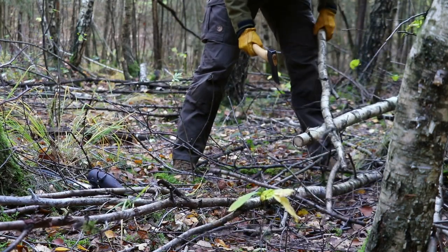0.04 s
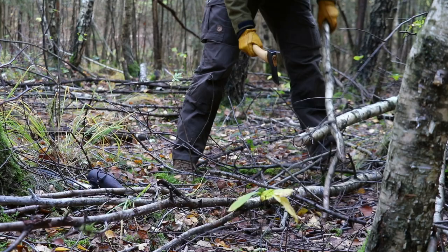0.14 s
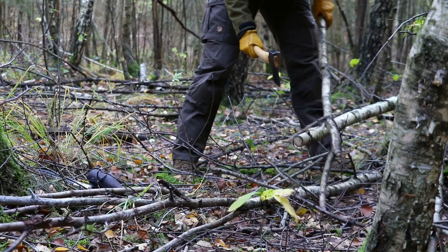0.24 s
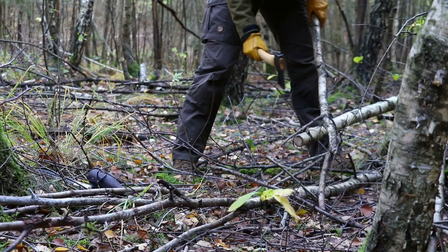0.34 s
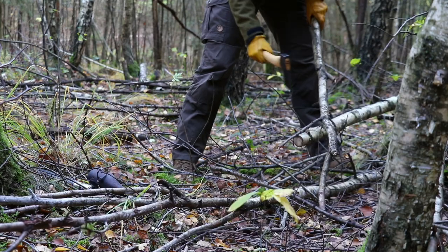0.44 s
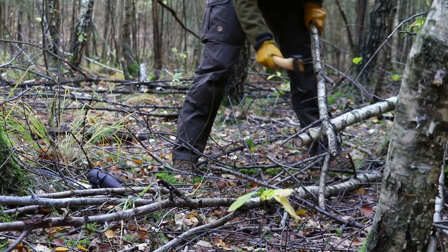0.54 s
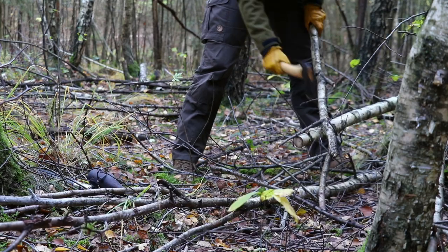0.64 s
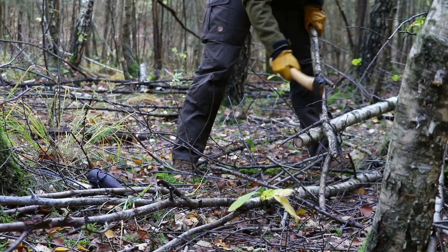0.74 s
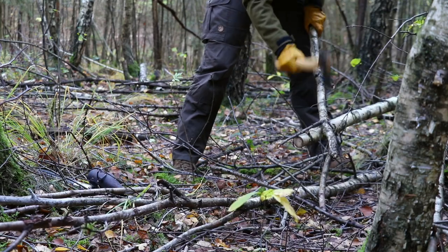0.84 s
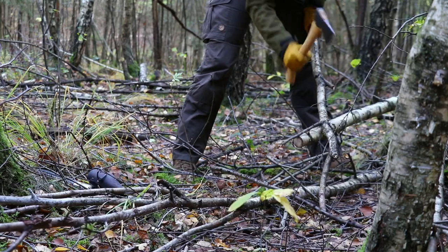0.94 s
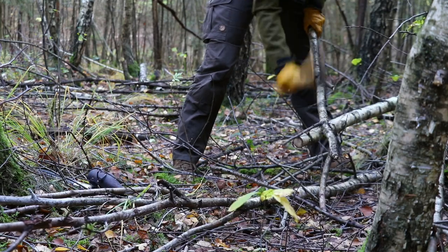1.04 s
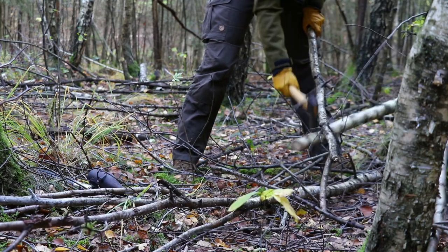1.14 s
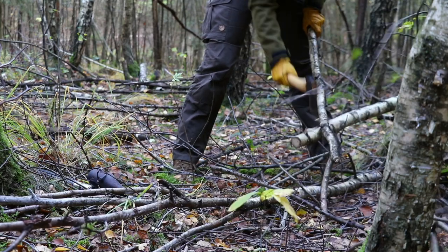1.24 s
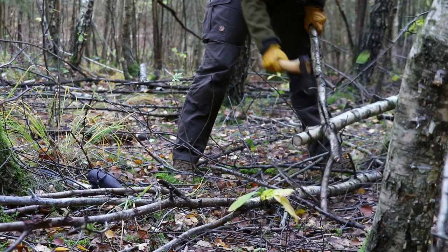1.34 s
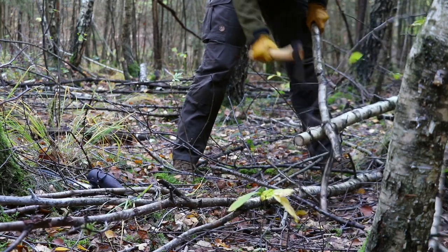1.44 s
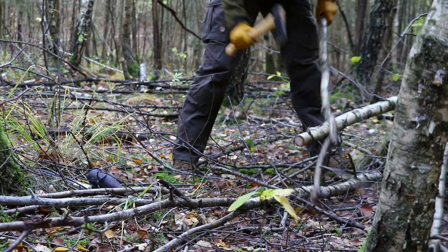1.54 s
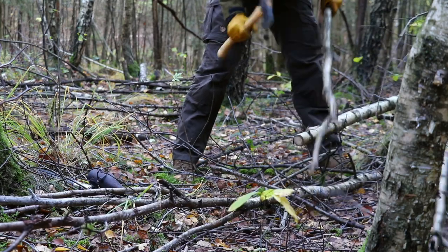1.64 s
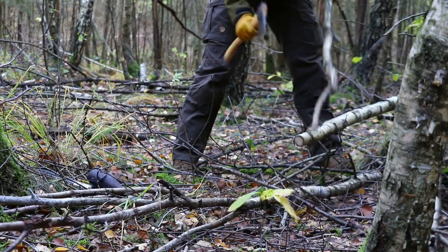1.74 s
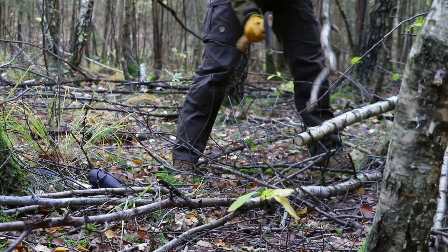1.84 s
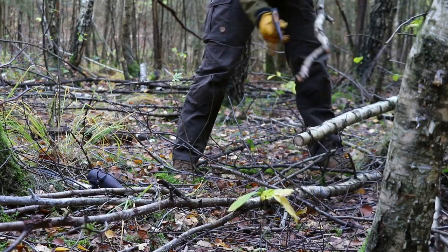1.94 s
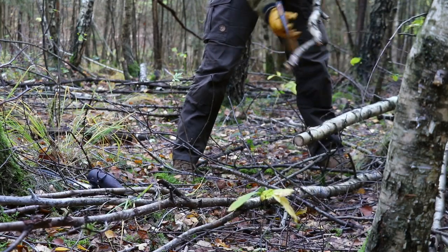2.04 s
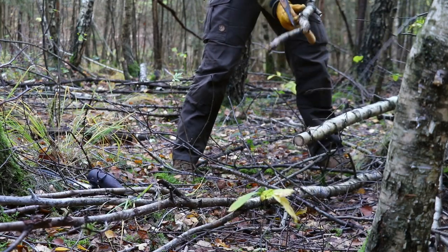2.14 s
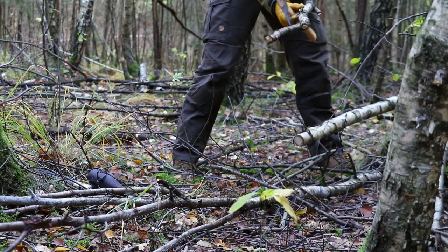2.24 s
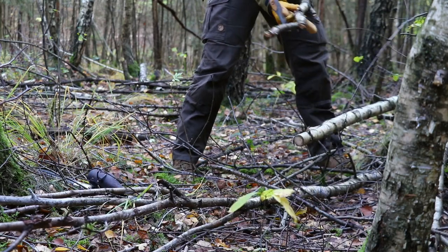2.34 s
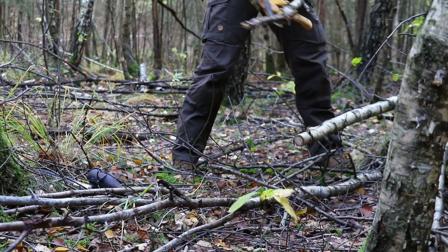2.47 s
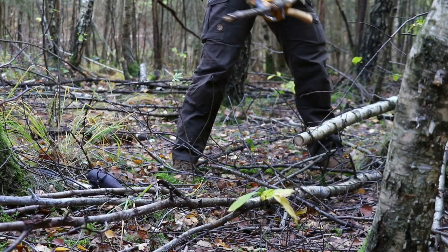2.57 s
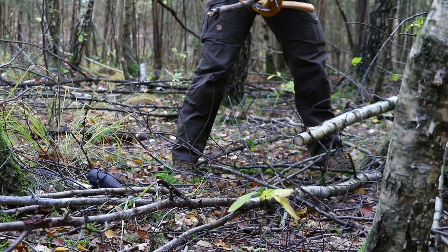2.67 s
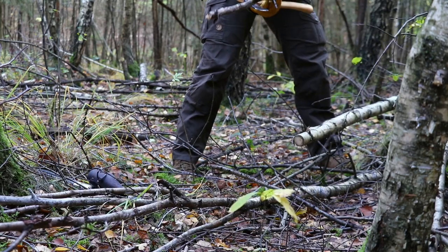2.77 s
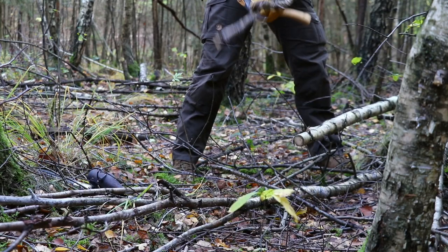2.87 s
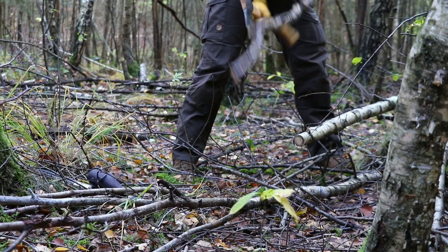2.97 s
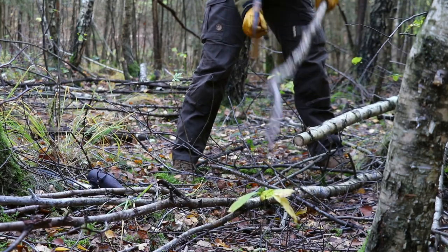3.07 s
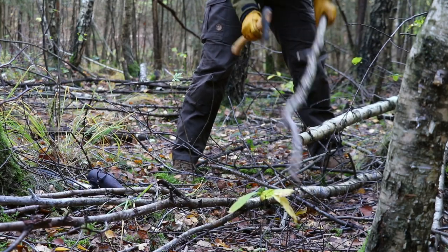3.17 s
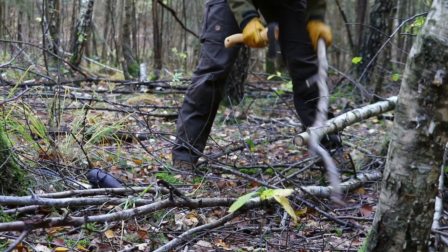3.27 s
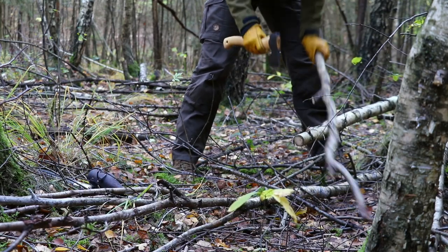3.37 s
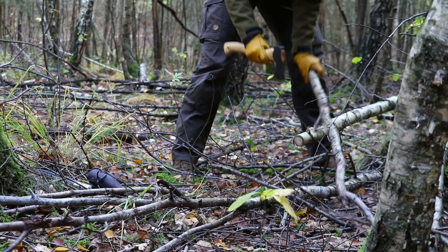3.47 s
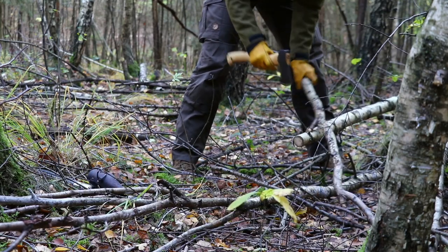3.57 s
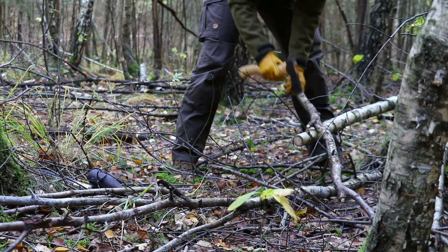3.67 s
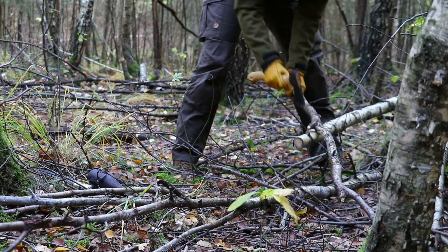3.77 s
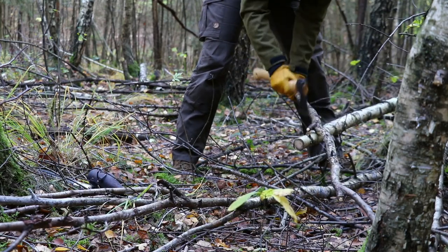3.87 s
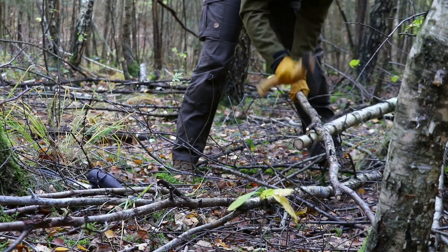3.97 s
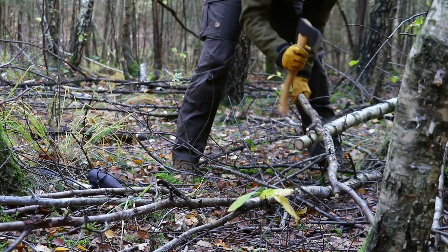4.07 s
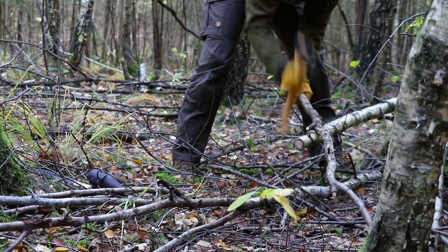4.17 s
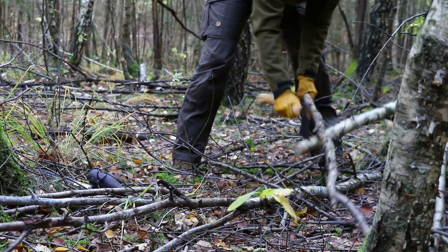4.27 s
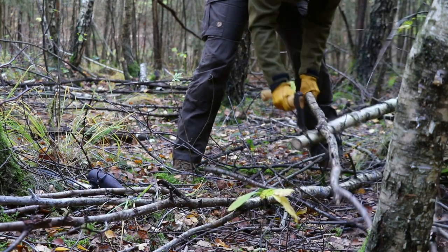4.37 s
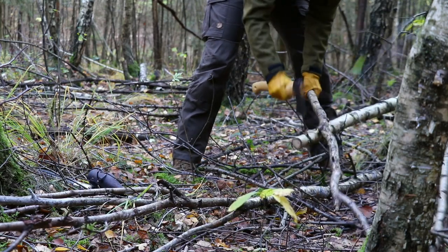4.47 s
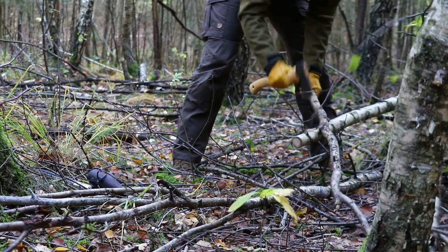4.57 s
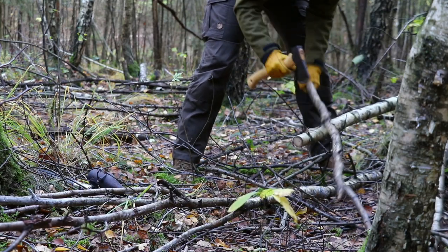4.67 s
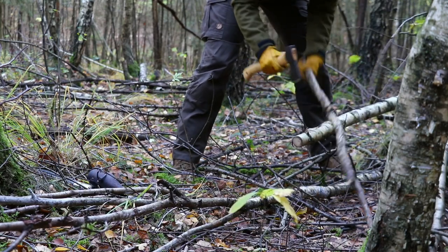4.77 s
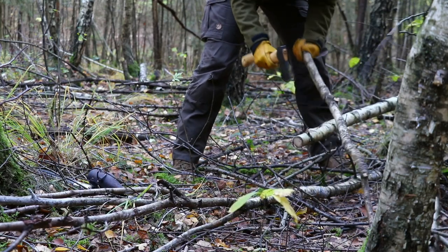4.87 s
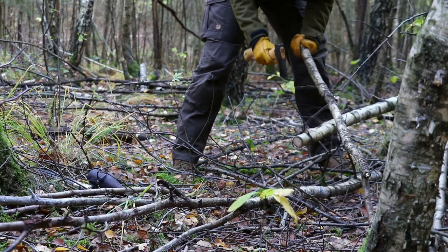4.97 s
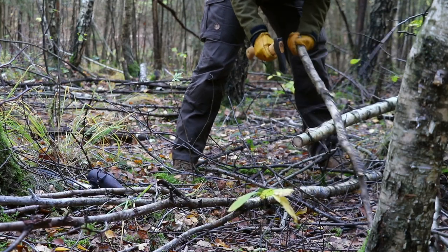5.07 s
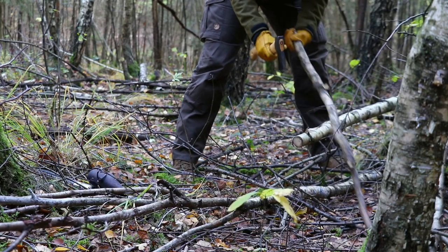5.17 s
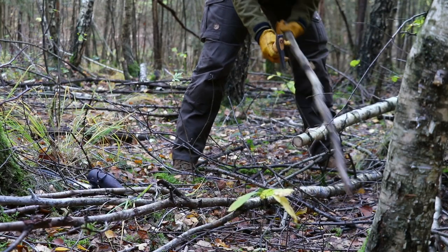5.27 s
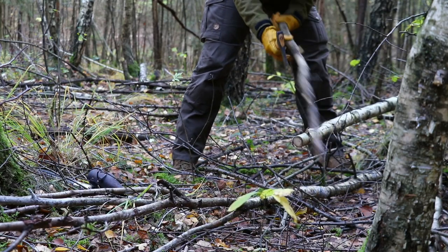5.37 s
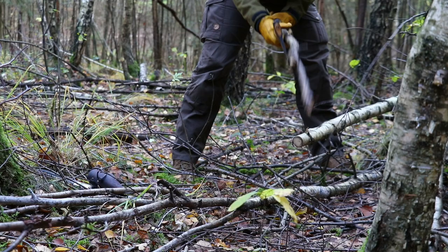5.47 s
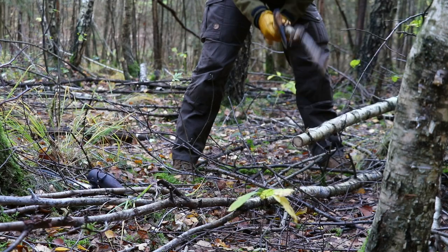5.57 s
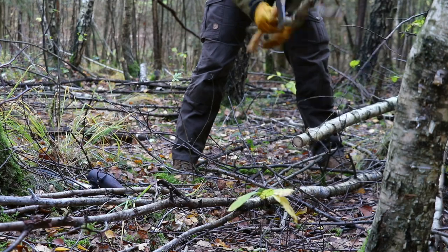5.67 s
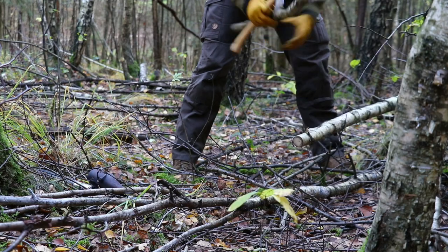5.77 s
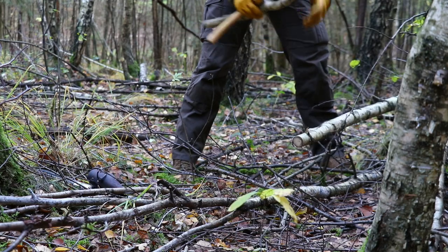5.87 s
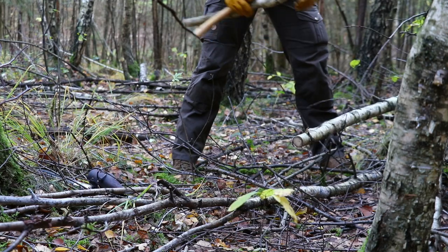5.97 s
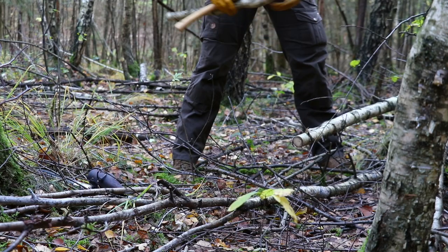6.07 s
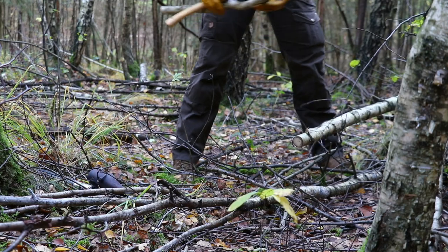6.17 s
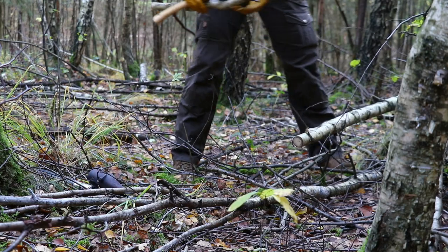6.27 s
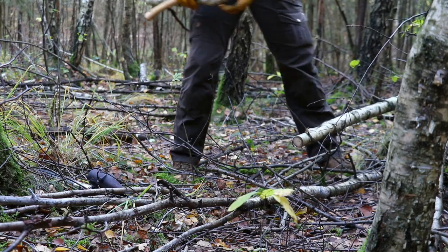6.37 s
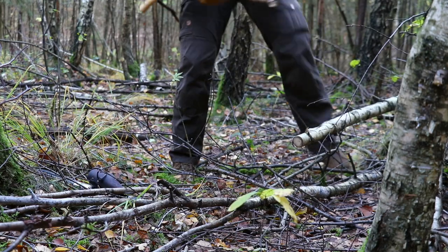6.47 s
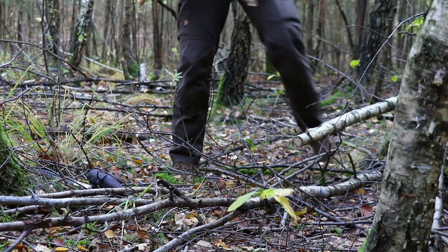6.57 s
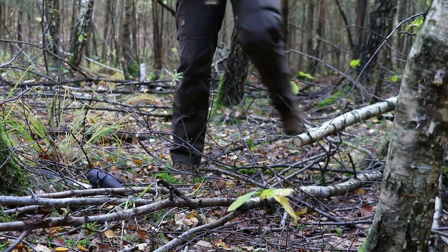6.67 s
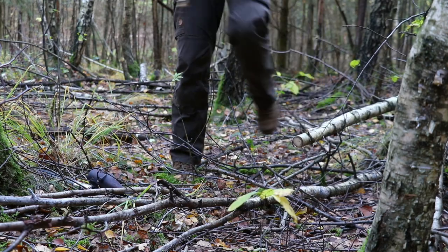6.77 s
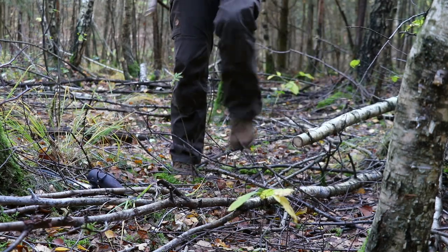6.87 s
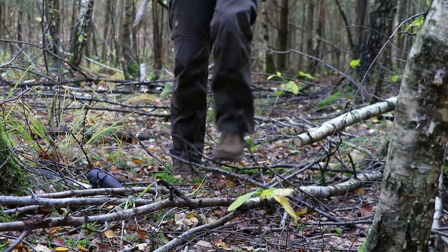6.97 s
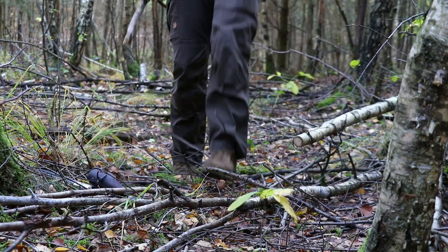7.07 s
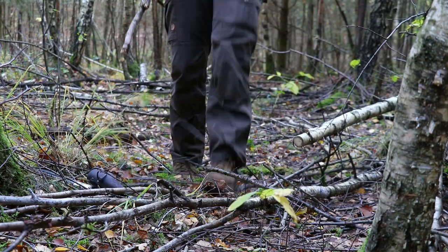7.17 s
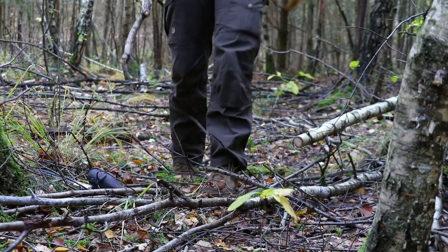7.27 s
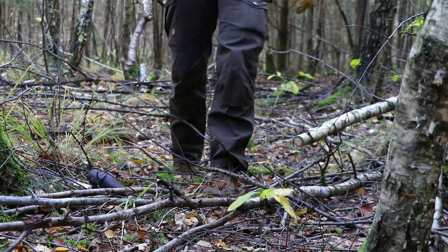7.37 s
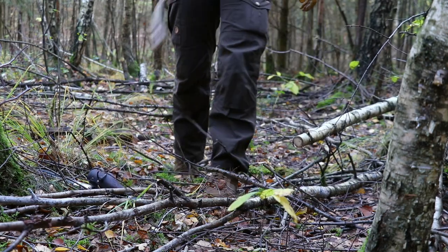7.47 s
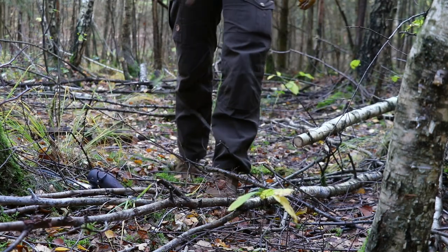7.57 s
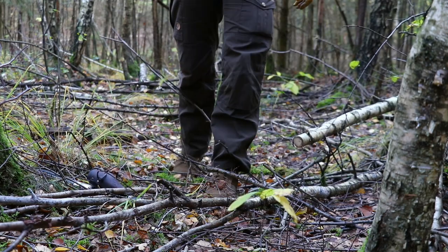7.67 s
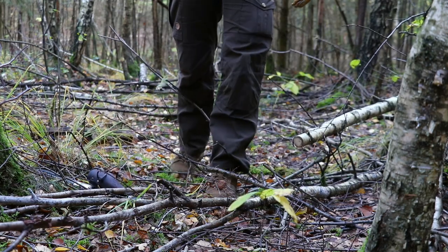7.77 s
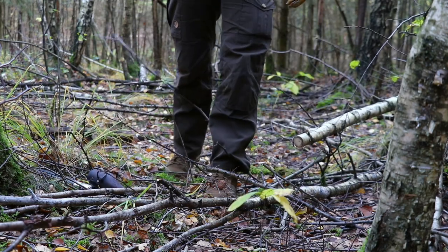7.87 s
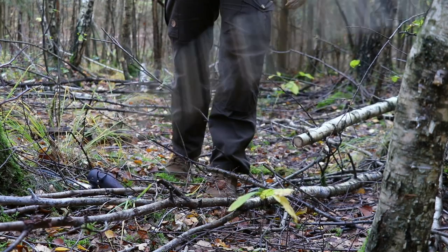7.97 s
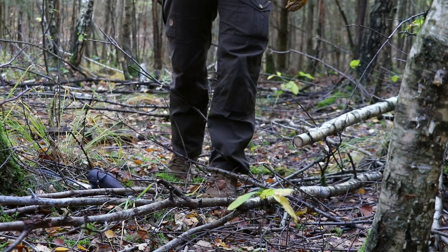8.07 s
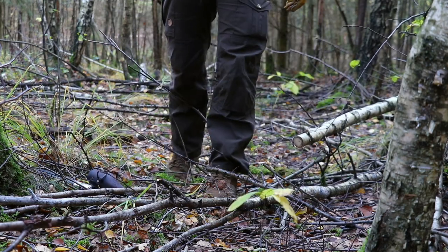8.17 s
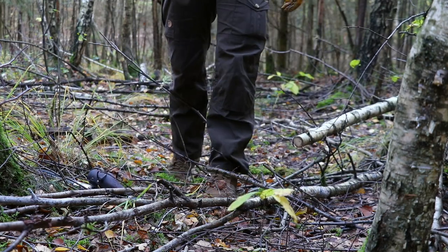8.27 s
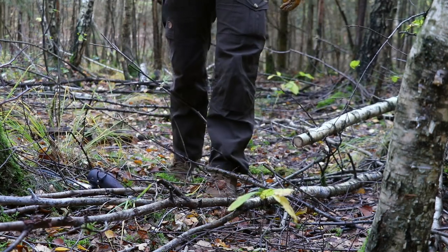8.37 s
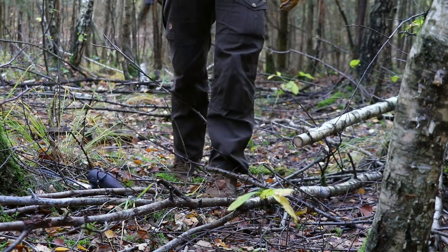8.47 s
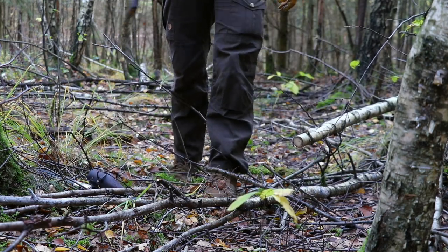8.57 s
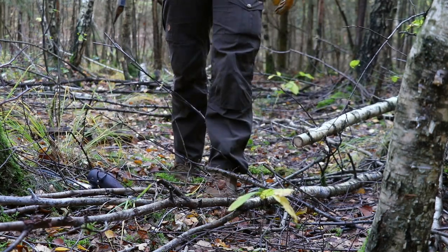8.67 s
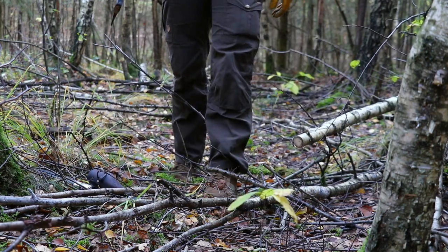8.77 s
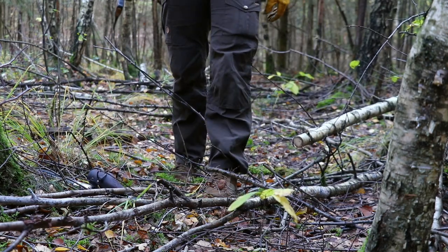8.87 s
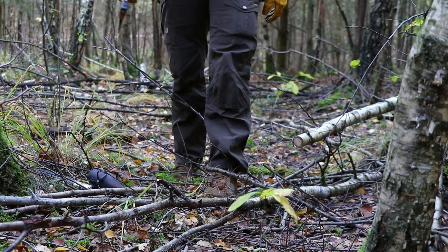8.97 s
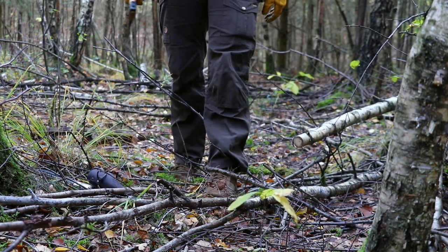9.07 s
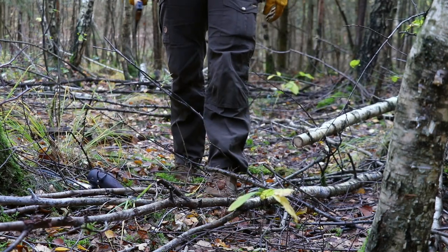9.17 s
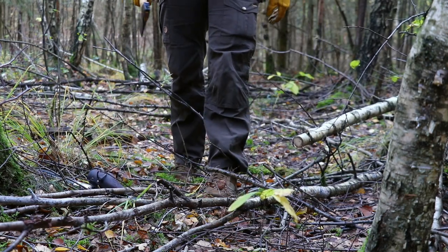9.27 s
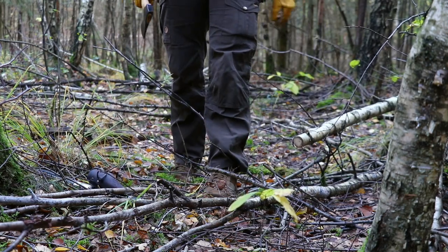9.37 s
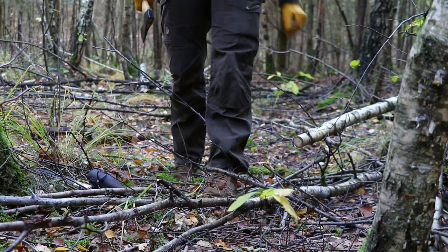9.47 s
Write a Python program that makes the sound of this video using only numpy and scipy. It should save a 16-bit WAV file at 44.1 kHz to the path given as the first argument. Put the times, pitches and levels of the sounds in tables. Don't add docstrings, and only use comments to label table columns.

```python
import sys
import numpy as np
from scipy import signal
from scipy.fft import rfft, irfft
from scipy.io import wavfile
from scipy.ndimage import uniform_filter1d

SR = 44100
rng = np.random.default_rng(int(sys.argv[2]) if len(sys.argv) > 2 else 0)


def transcribe(signal):
    frames = np.atleast_2d(signal).T
    limited = np.clip(frames, -1, 1)
    pcm = np.round(limited * 32767).astype(np.int16)
    wavfile.write(sys.argv[1], SR, pcm)


def to_linear_factor(level_db):
    exponent = np.asarray(level_db, float) / 20
    return 10 ** exponent


N = 420273
TIME = np.arange(N) / SR

# frequency in Hz, density in dB per Hz.
TRAFFIC_SPECTRUM = [(15, -45), (25, -0.5), (74, 3.5), (103, -1), (139, -3), (167, -3), (196, -7), (280, -5),
                    (430, -4.5), (1210, -7), (1800, -13), (2340, -47), (3960, -120)]
# frequency in Hz, density in dB per Hz.
HISS_SPECTRUM = [(1060, -30), (1800, 1.5), (2450, -2.5), (3040, -3.5), (3490, -5.5), (3960, -7.5),
                 (5200, -12), (6010, -8.5), (7740, -8), (9200, -10), (15700, -19.5)]
# frequency in Hz, likeness from 0 to 1.
PORT_LIKENESS = [(60, 0.97), (130, 0.85), (290, 0.83), (640, 0.5), (1410, 0), (3100, 0), (6820, 0.01),
                 (15000, 0.06)]
# time in seconds, level in dB.
TRAFFIC_LEVEL = [(0, -50), (1.5, -49.5), (2.5, -50.5), (4.5, -51), (6.2, -51.5), (7.1, -50), (8.0, -51.5),
                 (9.53, -51.5)]
# time in seconds, second order in Hz, its level in dB.
ENGINE = [(0, 168, -60.5), (1.5, 168, -74), (2.6, 167, -63), (4.5, 168, -60.5), (5.9, 170.5, -56),
          (7, 169, -56.5), (7.9, 167, -61.5), (8.4, 150, -62.5), (9.53, 149, -67)]
# peak in seconds, treble in dB, rise in ms, fall in ms, middle re treble in dB.
BRUSHES = [(0.002, -53, 9.7, 77, 6), (0.256, -60, 370, 86, 3), (1.11, -47.5, 9.4, 220, -1),
           (1.36, -50, 79, 97, 0.5), (1.469, -47, 22, 34, -0.5), (1.63, -48.5, 240, 98, 1),
           (2.05, -71, 240, 107, -4), (2.36, -62.5, 53, 265, -2.5), (2.87, -54, 82, 30, -1.5),
           (3.49, -54, 31, 42, 5), (3.66, -63.5, 74, 150, 7.5), (4.24, -42.5, 10.6, 69, 2.5),
           (4.488, -46.5, 15, 11, -3), (4.6, -55, 356, 192, 0.5), (4.83, -42, 2, 7.9, -5),
           (5.65, -59.5, 500, 99, 0.5), (6.0, -59.5, 77, 73, 8), (6.21, -61, 150, 240, -14)]
LEAVES = [(6.48, -59, 68, 220, 2.5), (6.98, -53.5, 140, 460, 4.5), (7.163, -49, 167, 120, 2.5),
          (7.35, -49.5, 34, 68, -0.5), (7.61, -54, 45, 63, 4.5), (7.9, -58, 110, 15, 3),
          (8.04, -49, 14, 5.2, -12.5), (8.075, -47.5, 5.2, 101, 1.5), (8.143, -30, 9.5, 82, -4.5),
          (8.196, -35.5, 19, 41, -17.5), (8.29, -37.5, 43, 45, -0.5), (8.343, -33, 17, 42, -3.5),
          (8.42, -47.5, 19, 270, -1), (8.85, -85, 97, 300, -10), (9.32, -69, 56, 200, -13)]
# start in seconds, length in seconds, first Hz, last Hz, level in dB.
BIRD_CALLS = [(0.155, 0.128, 7200, 7770, -62), (0.734, 0.18, 7350, 7900, -59),
              (1.957, 0.099, 7600, 7930, -63), (2.298, 0.13, 7270, 7800, -60.5),
              (2.695, 0.14, 7400, 7850, -59), (5.01, 0.085, 7450, 7860, -58),
              (5.128, 0.27, 7850, 7900, -69.5), (5.815, 0.15, 7120, 7850, -62),
              (6.15, 0.18, 7200, 8000, -61), (8.68, 0.136, 7340, 7880, -60),
              (9.255, 0.15, 7200, 7740, -65.5)]
# start in seconds, treble peak in dB, middle in dB, wood in dB, burst in ms.
CHOP_1_CRACKS = [(1.0752, -3, -11, -22, .35), (1.0764, -8, -7, -16, .9), (1.0774, -2, -11, -22, .4),
                 (1.078, 0, -12, -26, .5), (1.0835, -26, -4, 10, 1.0), (1.0895, -36, -4, 17, 1.0)]
CHOP_2_CRACKS = [(4.2131, -17, 4.5, 1, 0.78), (4.2147, -6, -1, -12, 0.82), (4.217, -10.5, -3.5, 0.5, 1.5),
                 (4.223, -15.5, 1.5, -1, 1.56), (4.2848, -28.5, -1, -19.5, 2)]
THROW_1_CRACKS = [(8.0646, -36, 16.5, 16.5, 0.89), (8.0648, -16.5, 1, 13, 0.43),
                  (8.0699, -35, 9, 22, 0.614), (8.077, -25.5, -9, 10.5, 0.58), (8.096, -25, 0, -19, 1.3),
                  (8.113, -29, -9.5, -15, 0.9), (8.121, -31, 2.5, -17, 0.94)]
THROW_2_CRACKS = [(8.1475, -17, -11, 12.5, 3.1), (8.1477, -16, 7.5, 15, 0.643), (8.150, -26, 6, 17, 0.86),
                  (8.1535, -23, -20, 2, 1.28), (8.188, -23, -16, -3, 2.3), (8.199, -28, -9.5, 3.5, 3.7),
                  (8.34, -19, -32, -17, 2.9), (8.364, -29, -6, -3, 7.5)]
# frequency in Hz, level in dB, t60 in seconds.
CHOP_1_MODES = [(459, 1, 0.032), (810, 1, 0.019), (1159, 6, 0.018), (1490, 1.5, 0.022)]
CHOP_2_MODES = [(395, -12, 0.035), (583, -9.5, 0.035), (994, -9, 0.0216), (1250, -14, 0.057),
                (1511, 5, 0.025)]
THROW_1_MODES = [(302, -5, 0.027), (700, 8, 0.0099), (1030, -8, 0.037), (1310, -8.5, 0.0243),
                 (1850, -5.5, 0.0078), (2780, -14, 0.0093)]
THROW_2_MODES = [(460, 1.5, 0.026), (786, 0, 0.018), (1250, 8, 0.011), (2000, 4, 0.012)]
# echo in dB, its tilt in dB per octave, left lag in samples, left minus right in dB.
BLOW_ECHO = [
    (-32, 1.9, 4, -7),
    (-35, 3.5, 3.6, -7.5),
    (-41, 2, 4.6, -17.5),
    (-39, 0, 5.3, -18),
]
# centre in Hz, width in Hz, share of slow tearing from 0 to 1.
BLOW_TREBLE = [
    (7150, 3000, .04),
    (7500, 5630, 0.11),
    (7540, 9800, 0.099),
    (7500, 7700, 0.063),
]
# centre in Hz, level in dB, rise in ms, t60 in seconds.
TRUNK_BANDS = [(253, -11.5, 10, 0.3), (426, -4, 26, 0.26), (764, -6.5, 9.9, 0.16), (1250, -21.5, 8.7, 0.58),
               (3150, -21.5, 4.7, 0.077), (8000, -28.5, 4.9, 0.32)]
# start in seconds, frequency in Hz, peak in dB, decay in ms.
THUDS = [(1.098, 530, -32, 4.9), (1.109, 406, -28, 2.9), (1.131, 395, -30, 4), (1.201, 84.5, -50.5, 36),
         (3.479, 88, -46.5, 17.7), (4.24, 70.8, -42, 29.5), (4.2515, 358, -25, 4.5), (4.273, 337, -31, 5.9),
         (5.936, 172, -41, 11.1), (6.859, 217, -40, 5.5), (6.952, 129, -41, 4.6),
         (7.331, 544.4, -28.5, 1.5), (1.076, 280, -33, 4), (1.084, 490, -35, 3), (1.089, 765, -39, 3),
         (4.2125, 477, -26, 0.96), (4.2135, 950, -24, 1.2), (4.214, 1455, -17, 2.4),
         (4.229, 1280, -27, 2.7), (6.8605, 1330, -36, 1.8), (6.8605, 2350, -41, 1.2),
         (8.0632, 690, -10.5, 1.6), (8.0642, 2790, -24, 1.3), (8.067, 1060, -18, 2.8),
         (8.0714, 260, -17, 1.5), (8.0965, 2800, -34, 1.5), (8.1475, 2000, -11, 2), (8.185, 1250, -28, 3),
         (8.146, 444, -15, 1.6), (8.0696, 105, -17.5, 3.8), (8.076, 55, -22, 7), (8.11, 69.6, -36.5, 8.8),
         (8.151, 138, -23.5, 4.1), (8.156, 59.8, -22.5, 12), (8.185, 104.6, -24.5, 7.2),
         (8.191, 459, -36.5, 15), (8.215, 55, -27, 5.4), (8.241, 55, -34, 11.8), (8.27, 70.1, -33, 13),
         (8.291, 85, -29.5, 6), (8.348, 96, -35, 7.1), (8.365, 140.5, -39, 6.4)]
# start in seconds, level in dB, frequency in Hz, fall in ms.
FLICKS = [(1.15, -42, 9500, 12), (1.2216, -43, 11100, 5), (1.3034, -45, 8500, 9), (1.34, -38, 11100, 2.5),
          (1.361, -39, 8800, 9), (1.4301, -47, 10300, 4), (1.455, -44, 13500, 3), (1.464, -36, 8450, 9.4),
          (1.478, -44.5, 7770, 7), (1.493, -46, 7400, 6.6), (1.51, -46, 10500, 6), (1.56, -49, 9500, 4),
          (1.575, -46, 11500, 2), (1.605, -47, 9000, 20), (3.44, -57, 2490, 40), (4.36, -46, 11000, 12),
          (4.42, -45, 10500, 12), (4.6, -47, 11000, 16), (4.828, -37, 11600, 4), (5.36, -54, 8600, 6),
          (6.689, -54, 2700, 9.6), (6.70, -52, 7500, 22), (6.9888, -36.5, 9500, 2.5), (7.02, -47, 2500, 5),
          (7.045, -47, 4500, 3), (7.073, -45, 3000, 8), (7.125, -46, 5000, 3), (7.195, -46, 3500, 4),
          (7.102, -42, 4000, 4), (7.11, -43, 7500, 5), (7.149, -44, 2200, 4), (7.165, -43, 9000, 12),
          (7.235, -46, 11000, 3), (7.291, -37, 8000, 2.7), (7.333, -32, 8000, 4), (7.345, -41, 2600, 3),
          (7.419, -41, 3000, 2.7), (7.432, -46, 7500, 5.5), (7.4801, -47, 2500, 2.7),
          (8.1856, -30, 8800, 12), (8.2601, -37, 6000, 10), (8.281, -35, 3200, 6.7), (8.284, -36, 8500, 10),
          (8.302, -20, 10500, 1.0), (8.3175, -28, 10200, 5), (8.345, -29, 10000, 8.7),
          (8.362, -37, 5500, 8), (8.445, -34, 10500, 2), (8.765, -39.5, 5500, 4)]
# start in seconds, treble peak in dB, middle in dB, wood in dB, wood pitch in Hz.
KNOCKS = [(1.2235, -39.5, -1, 10, 1290), (1.3405, -38.5, -15, 1, 905), (1.3578, -33, -12, -10, 423),
          (1.4591, -30, -18, -2.5, 474), (1.6945, -33.5, -13, -9, 436), (2.441, -35, -12, -10.5, 592),
          (4.6687, -48, 3, -6, 474), (4.828, -28, -14, -23, 537), (5.3977, -36, -4.5, -1.5, 565),
          (5.9345, -44.5, 8.5, 20.5, 865), (6.0338, -48, 0.5, 11.5, 1113), ]
TWIGS = [(6.6105, -33, -21, -21, 969), (6.8604, -43, -2, 11, 1366), (6.9532, -19.5, -4, 0, 1350),
         (6.9548, -18, -5, 0.5, 1370), (6.9572, -25, -4, 1.5, 1280), (7.1552, -21.5, -5, -29, 463),
         (7.1856, -27, -8, -19, 401), (7.211, -32, 2, -7, 400), (7.2584, -26, -3, -3.5, 496),
         (7.291, -12.5, -7.5, -22, 502), (7.3326, -12.5, -11, -10.5, 596), (7.3794, -39, 8, -23, 982),
         (7.4147, -30.5, 4, -5, 1740), (7.4465, -30, 0, -2.5, 1730), (7.4594, -38, 3.5, -7.5, 1250),
         (7.5023, -36, 0, -15.5, 406), (7.5829, -38, -3, 1.5, 953), (7.6024, -38, 8, -6.5, 767)]
DEBRIS = [(7.9935, -36.5, 2.5, 1, 580), (8.0336, -33, -1.5, -18, 610), (8.4404, -27, -25, -24.5, 565),
          (8.5478, -37, 1.5, -21.5, 401), (8.6063, -33, -6, -22.5, 401), (8.6674, -34, -1, -23, 412),
          (8.7654, -33.5, -3, -6, 1245)]
# start in seconds, length in seconds, frequency in Hz, level in dB.
SQUEAKS = [(5.996, 0.027, 4150, -47.5), (6.005, 0.0275, 2590, -51.5), (6.055, 0.02, 3400, -54)]
# time in seconds, whistle in Hz, level in dB.
WHIP = [(6.682, 2850, -63), (6.692, 2650, -52), (6.72, 2060, -57), (6.766, 1720, -57), (6.806, 1420, -53),
        (6.87, 1375, -55), (6.94, 1330, -57), (6.98, 1550, -57), (7.035, 1560, -55)]


def band(x, hz, width_hz):
    return signal.lfilter(*signal.iirpeak(min(hz, 0.45 * SR), hz / width_hz, SR), x)


def band_twice(x, hz, width_hz):
    return band(band(x, hz, width_hz), hz, width_hz)


def unit(x):
    return x / np.sqrt(np.mean(x ** 2))


def curve(table, quiet=None):
    s, *columns = np.transpose(table)
    return [np.interp(TIME, s, c, left=quiet, right=quiet) for c in columns]


def walk(rate_hz):
    k = int(SR / rate_hz)
    steps = np.repeat(rng.standard_normal(N // k + 1), k)
    return unit(uniform_filter1d(uniform_filter1d(steps, k), k)[:N])


def tone(hz, db, wobble):
    phase = 2 * np.pi * np.cumsum(hz * (1 + wobble)) / SR
    return np.sqrt(2) * to_linear_factor(db) * np.sin(phase)


def treble(x):
    hump = 0.97 * band(x, 6650, 2630) + 1.2 * band(x, 8706, 4300) + 0.293 * band(x, 10300, 7300)
    return band(hump, 8400, 9300)


def pair(x, pan_db, bass, lag_samples):
    left, right = (x * to_linear_factor(side * pan_db / 2) + bass * to_linear_factor(side * pan_db * 0.084) for side in (1, -1))
    return np.array([np.roll(left, int(lag_samples)), right])


def add(out, x, start_s):
    i = int(start_s * SR)
    out[:, i:i + x.shape[1]] += x[:, :out.shape[1] - i]


def air():
    log_hz = np.log(np.maximum(np.fft.rfftfreq(N, 1 / SR), 1))

    def spectrum(table):
        table_hz, values = np.transpose(table)
        return np.interp(log_hz, np.log(table_hz), values)

    like = np.clip(spectrum(PORT_LIKENESS), 0, 1)
    mid, side = rfft(rng.standard_normal((2, N))) * np.sqrt([1 + like, 1 - like])
    ports = np.array([mid + side, mid - side])
    low = to_linear_factor(spectrum(TRAFFIC_SPECTRUM[:-1]))
    high = to_linear_factor(spectrum(HISS_SPECTRUM[1:]))
    above_bass, above_middle = log_hz >= np.log(140), log_hz >= np.log(1800)
    bass = unit(irfft(ports * low * ~above_bass, N))
    middle = unit(irfft(ports * low * above_bass * ~above_middle, N))
    hiss = unit(irfft(ports * high * above_middle * (log_hz < np.log(HISS_SPECTRUM[-1][0])), N))
    mid_db, = curve(TRAFFIC_LEVEL)
    bass_db = -55.5 + 1.5 * (mid_db + 50.5)
    bass = bass * to_linear_factor(bass_db + 0.26 * walk(6.1))
    middle = middle * to_linear_factor(mid_db + 2.0 + 0.5 * walk(4.036))
    return bass + middle + hiss * to_linear_factor(-55.5)


def drone():
    hz, db = curve(ENGINE)
    low_db = -60.5 - 0.2121 * TIME ** 2
    second = tone(hz, db + 1.8 * walk(5), 0.004 * walk(4))
    first = tone(hz / 2, low_db + 1.8 * walk(6), 0.01 * walk(5))
    return second + first


def stirring():
    high, mid = np.full((2, N), to_linear_factor(2 * -68))
    for s, db, rise_ms, fall_ms, mid_db in BRUSHES + LEAVES:
        ms = (TIME - s) * 1000
        decay = np.where(ms < 0, -ms / max(rise_ms, 1), ms / max(fall_ms, 1))
        power = to_linear_factor(2 * db) * np.exp(-2 * decay)
        high = high + power
        mid = mid + power * to_linear_factor(2 * mid_db)
    return 10 * np.log10(high), 10 * np.log10(mid / high)


def rustle():
    high_db, mid_db = stirring()
    pan_db = -2.5 - 0.24 * (high_db + 59.5)
    clicks = (rng.random((3, N)) < 4000 / SR) * rng.standard_normal((3, N))
    clicks = clicks * to_linear_factor(2.1 * rng.exponential(size=(3, N)).clip(0, 4))
    grains = unit(clicks) + 1.2 * rng.standard_normal((3, N))
    grains = grains * to_linear_factor(1.1 * walk(40) + 1.8 * walk(160))
    shared = np.array([np.roll(grains[0], 7), grains[0]])
    grains = shared + 4.83 * grains[1:]
    high = unit(treble(grains) + 0.19 * band(grains, 12600, 5000))
    mid = unit(band_twice(grains, 3200, 6730))
    return (high + to_linear_factor(mid_db) * mid) * to_linear_factor(high_db + 2.0 + np.array([pan_db, -pan_db]) / 2)


def bird():
    out = np.zeros((2, N))
    for s, length_s, first_hz, last_hz, db in BIRD_CALLS:
        u = np.arange(int(length_s * SR)) / (length_s * SR)
        hz = last_hz - (last_hz - first_hz) * np.exp(-(u / 0.36) ** 1.5)
        wobble = 0.0071 * np.sin(2 * np.pi * 45 * u * length_s + rng.random() * 6)
        arch = np.sin(np.pi * u)
        swell = arch ** 0.19 * (0.6 + 2.2 * arch ** 2 * u)
        add(out, tone(hz, db, wobble)[None] * swell, s)
    smear = rng.standard_normal((2, 4000)) * np.exp(-np.arange(4000) / SR / 0.031)
    return 0.34 * out + signal.fftconvolve(out, smear * 0.04, axes=1)[:, :N]


def crack(peak_db, mid_db, wood_db, burst_ms, pan_db, modes, lag_samples, bright_hz, width_hz, tear=0.087):
    t = np.arange(4096) / SR
    decay = np.exp(-t * 1000 / max(burst_ms, 0.1)) + tear * np.exp(-t / 0.0088)
    burst = rng.standard_normal((3, 4096)) * decay
    burst[:, 0] = 3 * np.sign(burst[:, 0])
    ring = 0
    for hz, db, t60_s in modes:
        ring = ring + to_linear_factor(db) * np.exp(-np.log(1000) * t / t60_s) * np.sin(2 * np.pi * hz * t)
    high = band(treble(burst[0]), bright_hz, width_hz)
    mid = band_twice(burst[1], 2950, 2850)
    wood = signal.fftconvolve(burst[2], ring)[:4096]
    high, mid, wood = (p / np.abs(p).max() for p in (high, mid, wood))
    return to_linear_factor(peak_db) * pair(high + to_linear_factor(mid_db) * mid, pan_db, to_linear_factor(wood_db) * wood, lag_samples)


def trunks(tilt_db):
    t = np.arange(SR // 2) / SR
    out = 0
    for hz, db, rise_ms, t60_s in TRUNK_BANDS:
        mid, side = (unit(band_twice(rng.standard_normal(len(t)), hz, 0.48 * hz)) for _ in range(2))
        shape = (1 - np.exp(-(t * 1000 / rise_ms) ** 2)) * np.exp(-np.log(1000) * t / t60_s)
        ports = mid + min(hz / 2500, 1) * side * np.array([[1], [-1]])
        out = out + to_linear_factor(db + tilt_db * np.log2(hz / 400)) * shape * ports
    return out


def blows():
    out = np.zeros((2, N))
    blow_cracks = CHOP_1_CRACKS, CHOP_2_CRACKS, THROW_1_CRACKS, THROW_2_CRACKS
    blow_modes = CHOP_1_MODES, CHOP_2_MODES, THROW_1_MODES, THROW_2_MODES
    for cracks, modes, echo, top in zip(blow_cracks, blow_modes, BLOW_ECHO, BLOW_TREBLE):
        echo_db, tilt_db, lag_samples, pan_db = echo
        add(out, to_linear_factor(echo_db + 9.5) * trunks(tilt_db), cracks[0][0])
        for s, *levels in cracks:
            add(out, crack(*levels, pan_db, modes, lag_samples, *top), s)
    return out


def thuds():
    out = np.zeros((2, N))
    t = np.arange(SR // 4) / SR - np.array([[0.16 / 1000], [0]])
    for s, hz, db, decay_ms in THUDS:
        u = np.maximum(t, 0) * 1000 / decay_ms
        add(out, to_linear_factor(db) * np.e * u * np.exp(-u) * np.sin(2 * np.pi * hz * t), s)
    return out


def flicks():
    out = np.zeros((2, N))
    ms = np.arange(8192) * 1000 / SR
    pan_db = np.array([[1], [-1]]) * -9 / 2
    for s, db, hz, fall_ms in FLICKS:
        grit = rng.standard_normal((3, len(ms))) * to_linear_factor(3 * rng.exponential(size=len(ms)).clip(0, 4))
        puff = unit(band_twice(grit[0] + 0.46 * grit[1:], hz, 0.69 * hz))
        shape = (1 - np.exp(-ms / 0.66)) * np.exp(-ms / max(fall_ms, 0.5))
        add(out, puff * shape * to_linear_factor(db + pan_db), s)
    return out


def snaps():
    out = np.zeros((2, N))
    for rows, pan_db, burst_ms in ((KNOCKS, -11.5, 2.1), (TWIGS, -2, 0.89), (DEBRIS, -6, 1.3)):
        for s, peak_db, mid_db, wood_db, hz in rows:
            body = [(hz, 0, 0.022), (hz * 0.78, -5, 0.014), (hz * 1.24, -4, 0.012), (hz * 1.64, -12, 0.008)]
            snap = crack(peak_db, mid_db, wood_db, burst_ms, pan_db, body,
                         lag_samples=1.5, bright_hz=11200, width_hz=10700)
            add(out, snap, s)
    return out


def scrape():
    out = np.zeros((2, N))
    for s, length_s, hz, db in SQUEAKS:
        rough = unit(band_twice(rng.standard_normal(int(length_s * SR)), hz, 700))
        add(out, pair(rough * to_linear_factor(db) * np.hanning(len(rough)), -7, 0 * rough, 2.6), s)
    return out


def whip():
    hz = curve(WHIP)[0]
    db, = curve(np.array(WHIP)[:, ::2], quiet=-120)
    octave = tone(2 * hz, db - 16 + 4 * walk(200), 0.05 * walk(500))
    return octave + tone(hz, db - 1 + 4.5 * walk(90), 0.033 * walk(400))


def scene():
    wood = blows() + snaps()
    return wood + rustle() + scrape() + thuds() + bird() + whip() + drone() + air() + flicks()


def band_limit(x):
    return signal.sosfilt(signal.butter(12, 15780, fs=SR, output="sos"), x)


def record(dry):
    highpass = signal.butter(2, 32, "highpass", fs=SR, output="sos")
    heard = np.clip(signal.sosfilt(highpass, dry), -1, 1)
    return band_limit(heard)


dry = scene()
out = record(dry)
transcribe(out)
```